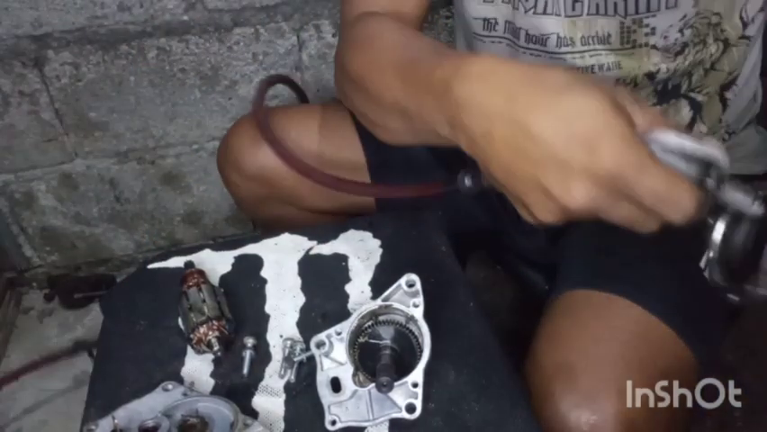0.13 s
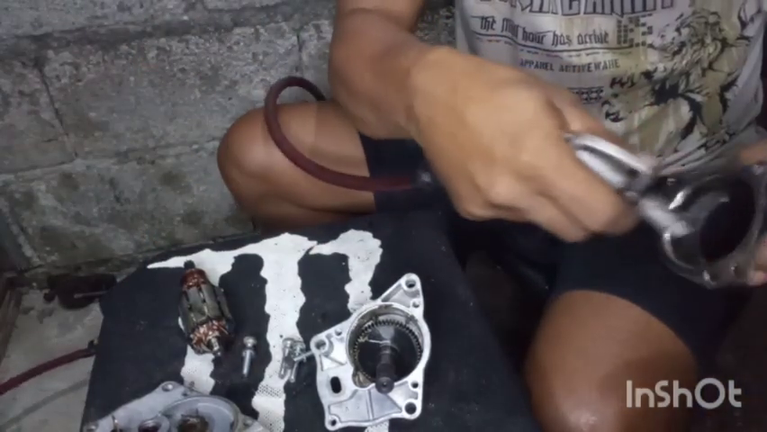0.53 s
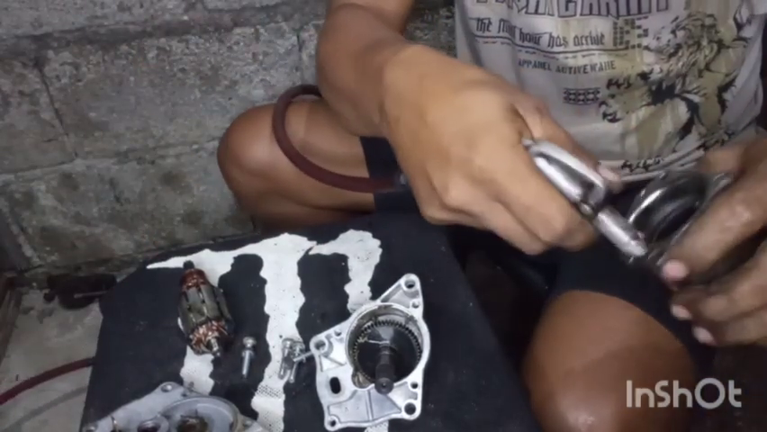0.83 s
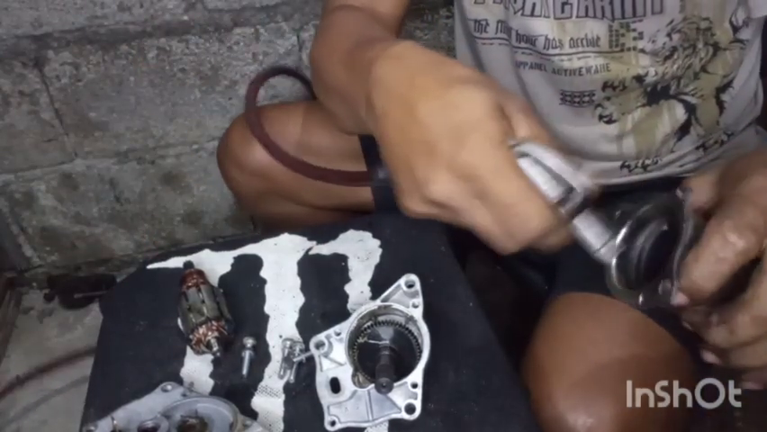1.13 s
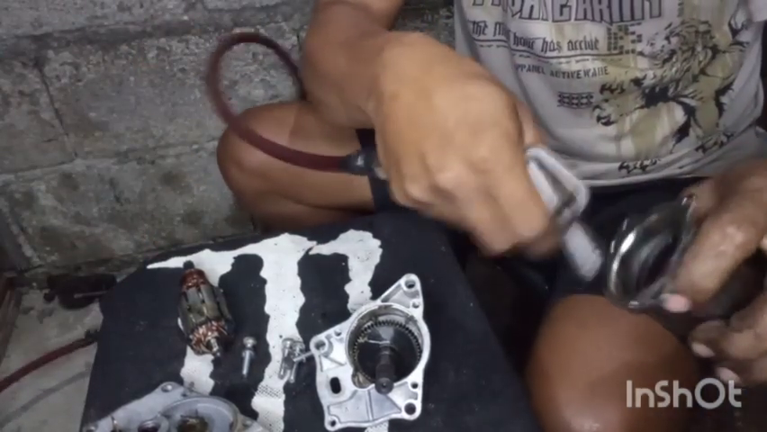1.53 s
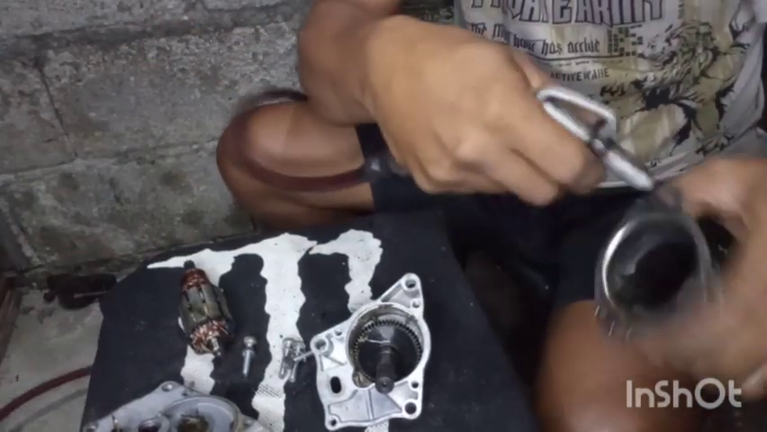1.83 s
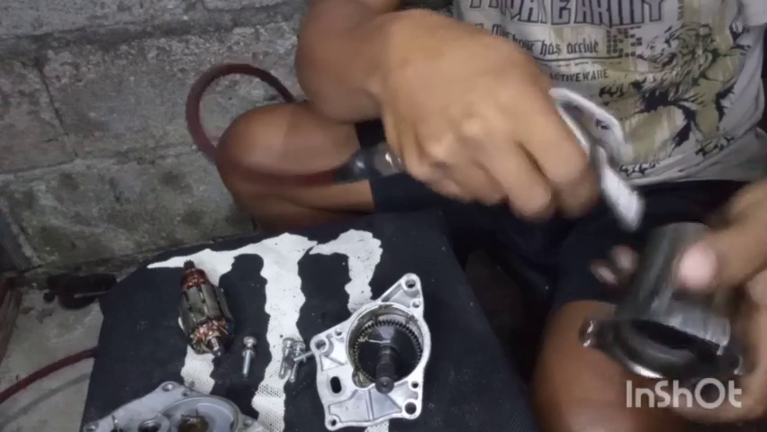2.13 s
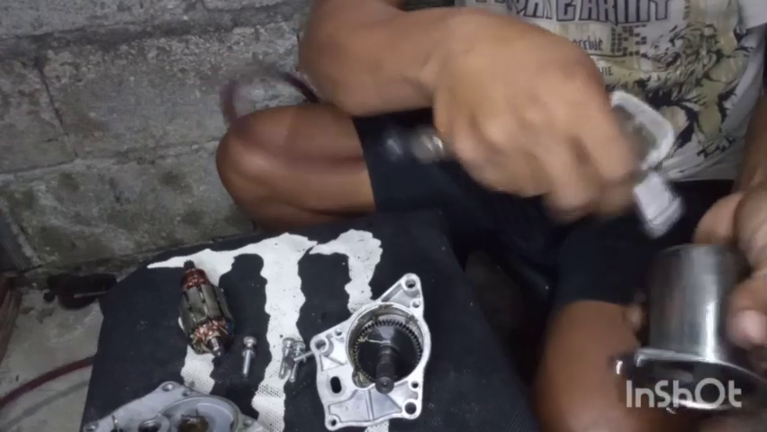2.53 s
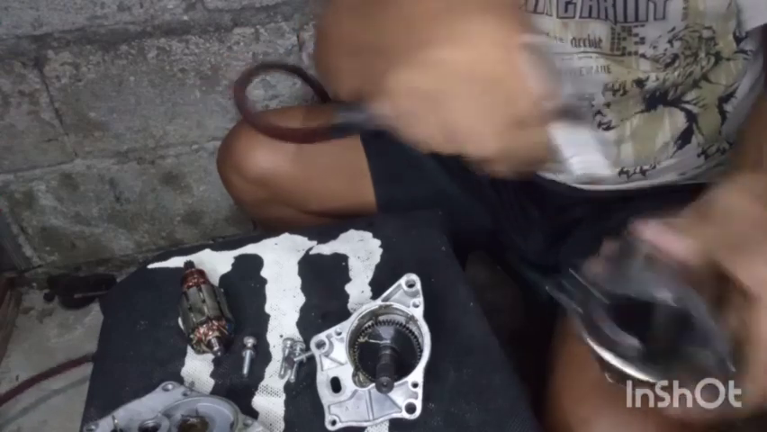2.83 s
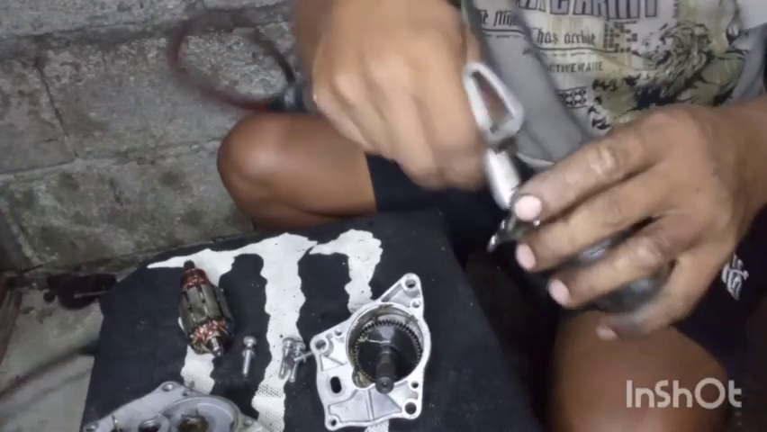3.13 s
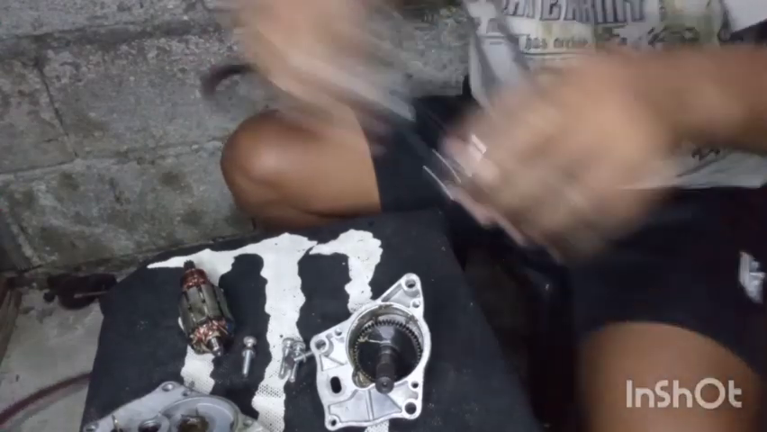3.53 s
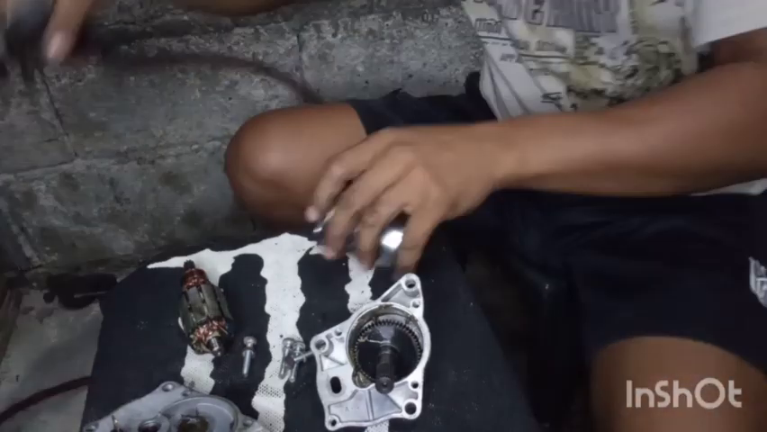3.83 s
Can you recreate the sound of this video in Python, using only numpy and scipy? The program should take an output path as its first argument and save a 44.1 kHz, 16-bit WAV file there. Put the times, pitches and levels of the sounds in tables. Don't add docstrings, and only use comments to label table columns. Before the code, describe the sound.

A compressed-air blow gun hisses loudly and sharply from 0 to about 3.45 seconds, sweeping a hollow metal motor housing. The jet whistles high, flares on edges, roars in bores and makes brief bottle-like hoots, with low gusts and overload crackle at a close small microphone. It shuts off quickly; faint yard ambience and chirps return, a dull double thud lands on a mat near 3.78, then a tiny airy puff at 3.94.

```python
import sys
import numpy as np
from scipy import signal
from scipy.fft import rfft, irfft
from scipy.io import wavfile
from scipy.ndimage import map_coordinates

SR = 44100
rng = np.random.default_rng(int(sys.argv[2]) if len(sys.argv) > 2 else 0)


def bounce(signal):
    frames = np.transpose(np.atleast_2d(signal))
    limited = np.clip(frames, -1, 1)
    pcm = np.round(limited * 32767).astype(np.int16)
    wavfile.write(sys.argv[1], SR, pcm)


def amplitude_ratio(level_db):
    exponent = np.asarray(level_db, float) / 20
    return 10 ** exponent


N = 176400
T = np.arange(N) / SR
HZ = np.fft.rfftfreq(N, 1 / SR)
RELEASE_S = 3.453


def rms_one(x):
    return x / np.sqrt(np.mean(x ** 2) + 1e-20)


def drift(rate_hz):
    count, step_s = N // 20, 20 / SR
    slowing = 1 + (np.fft.rfftfreq(count, step_s) / rate_hz) ** 2
    slow = irfft(rfft(rng.standard_normal(count)) / slowing, count)
    return np.interp(T, np.arange(count) * step_s, rms_one(slow))


def swells(rows, rest_db):
    power = sum(amplitude_ratio(2 * r[2]) * np.exp(-8 * np.log(2) * np.abs((T - r[0]) / r[1]) ** 3) for r in rows)
    return 10 * np.log10(power + amplitude_ratio(2 * rest_db))


def nudges(rows):
    return sum(db * np.exp(-2.0 * ((T - s) / length) ** 2) for s, length, db in rows)


def whistle(hz, width_hz):
    f = np.fft.fftfreq(N, 1 / SR)
    noise = np.fft.fft(rng.standard_normal(N)) * np.exp(2j * np.pi * rng.random(N))
    base = np.fft.ifft(noise / (1 + (1.3 * f / width_hz) ** 2))
    return rms_one(np.real(base * np.exp(2j * np.pi * np.cumsum(hz + 0 * T) / SR)))


def patchy(spectrum, patchy_db, rate_hz):
    hz, db = np.transpose(spectrum)
    place = 3 * np.log2(np.maximum(HZ, 20) / 20)
    colour = amplitude_ratio(np.interp(np.log(HZ + 1), np.log(hz), db, left=-70))
    coloured = rfft(rng.standard_normal(N)) * colour
    together = drift(6.6)
    out = 0
    for k in range(int(3 * np.log2(hz[0] / 20)), 31):
        band = irfft(coloured * np.clip(1 - abs(place - k), 0, 1), N)
        out = out + band * amplitude_ratio(patchy_db * (0.6 * together + drift(rate_hz)))
    return rms_one(out)


def ring(clicks, hz, t60):
    r, w = amplitude_ratio(-60 / (t60 * SR)), 2 * np.pi * hz / SR
    return signal.lfilter([0, np.sin(w)], [1, -2 * r * np.cos(w), r * r], clicks + 1e-18)


def dying_noise(s, t60, low_hz, high_hz):
    band = signal.butter(2, [low_hz, high_hz], "band", fs=SR, output="sos")
    noise = signal.sosfilt(band, rng.standard_normal(N))
    return rms_one(noise) * (T > s) * amplitude_ratio(-60 * np.maximum(T - s, 0) / t60)


# frequency in Hz, density in dB per Hz.
YARD = [(45, -24), (190, -15.5), (560, -5.5), (1300, -18.5), (2800, -23), (6300, -31.5), (10500, -33.5),
        (15700, -57)]
# centre in seconds, length in seconds, pitch in Hz, level in dB.
CHIRPS = [(3.58, .05, 560, -52), (3.52, .06, 620, -56), (3.67, .08, 2000, -66), (3.72, .05, 2830, -66),
          (3.55, .12, 1500, -65), (3.71, .16, 1620, -67), (3.86, .1, 1600, -67), (3.7, .14, 2450, -68),
          (3.75, .05, 6210, -69), (3.905, .05, 6190, -65), (3.94, .03, 1060, -55), (3.98, .07, 650, -54),
          (3.965, .06, 2900, -65), (3.57, .12, 70, -54), (3.87, .07, 75, -54), (3.95, .08, 90, -53),
          (3.69, .03, 220, -54), (3.96, .06, 260, -58)]


def yard():
    floor_db, ducked_db, recover_s = -52, -21.5, 0.012
    duck_db = ducked_db * np.exp(-np.maximum(T - RELEASE_S, 0) / recover_s)
    out = amplitude_ratio(floor_db + duck_db) * patchy(YARD, patchy_db=3.0, rate_hz=11.0)
    for s, length, hz, db in CHIRPS:
        out += amplitude_ratio(swells([(s, length, db)], -99)) * whistle(hz, 19 + 0.014 * hz)
    return out


# contact in seconds, peak in dB.
THUDS = [
    (3.7745, -48),
    (3.7768, -29.5),
    (3.785, -28),
    (3.828, -48),
    (3.837, -44),
]
# frequency in Hz, level in dB, 60 dB decay in seconds.
MAT = [(129.7, 2.5, 0.082), (273, 9, 0.023), (332, 2.5, 0.055), (502, -8.5, 0.043), (655, -8.5, 0.045),
       (1180, -14, 0.018)]


def thud():
    rustle_db, rustle_t60 = -15, .05
    clicks, out = np.zeros(N), 0
    for s, db in THUDS:
        clicks[int(s * SR)] = amplitude_ratio(db)
        low = dying_noise(s, rustle_t60, 790, 2100)
        high = dying_noise(s, rustle_t60, 4200, 16000)
        out = out + amplitude_ratio(db + rustle_db) * (low + 0.15 * high)
    for k, (hz, db, t60) in enumerate(MAT):
        out = out - amplitude_ratio(db) * ring(clicks, hz, t60) * (-1) ** k
    return out


def valve_tick():
    return amplitude_ratio(-55) * dying_noise(3.942, 0.21, 7200, 18000)


# centre in seconds, length in seconds, level in dB.
HOOTS = [(.18, 0.038, -42), (.225, 0.033, -52), (.265, 0.038, -37), (.335, 0.036, -47), (.4, 0.047, -41),
         (.46, 0.026, -48), (.62, .04, -50), (1.0, 0.039, -39.5), (1.1, 0.041, -43), (1.141, 0.022, -34.5),
         (1.24, 0.07, -37.5), (1.355, 0.048, -34), (1.48, 0.07, -40), (1.56, 0.029, -42.5),
         (1.66, 0.03, -45), (1.77, 0.083, -39), (2.22, 0.055, -44.5), (2.42, 0.035, -49),
         (2.87, 0.057, -40.5), (2.93, 0.03, -34.5), (2.99, .05, -35.5), (3.05, 0.028, -39.5),
         (3.1, 0.026, -41), (3.185, 0.032, -36), (3.25, 0.038, -48), (3.32, 0.04, -36.5),
         (3.375, 0.038, -35.5), (3.42, .04, -43.5), (3.455, 0.019, -38)]


def cup():
    cup_hz, wobble_hz = 1045, 22
    tone = np.sqrt(2) * np.sin(2 * np.pi * np.cumsum(cup_hz + wobble_hz * drift(30.05)) / SR)
    breath = .75 * whistle(cup_hz, 110) + .4 * whistle(cup_hz, 400)
    return amplitude_ratio(swells(HOOTS, -70) - 4.5) * (tone + breath)


# centre in seconds, length in seconds, level in dB.
GUSTS = [(.065, 0.022, -39), (.32, 0.043, -41.5), (.6, 0.036, -49.5), (.94, 0.039, -52), (1.07, .04, -47.5),
         (1.25, 0.047, -44), (1.58, 0.029, -51.5), (1.85, 0.026, -48.5), (2.28, 0.023, -46),
         (2.45, .03, -45.5), (2.68, 0.067, -46), (3.24, 0.029, -44)]


def gusts():
    rumble = signal.lfilter(*signal.butter(2, 90, "high", fs=SR), whistle(220.4, 410))
    return amplitude_ratio(swells(GUSTS, -81)) * rumble


# centre in seconds, length in seconds, level in dB, pitch in Hz.
BORES = [
    (.064, 0.073, -40, 4400),
    (1.155, .06, -33, 4300),
    (1.44, 0.075, -31.5, 5220),
    (1.634, .045, -38.5, 3800),
    (1.814, 0.066, -31, 4295),
    (2.909, 0.028, -31.5, 4300),
    (3.02, 0.045, -34.5, 4285),
    (3.173, 0.038, -38.5, 4580),
]


def bores():
    return sum(amplitude_ratio(swells([(s, length, db)], -99)) * whistle(hz, 1600) for s, length, db, hz in BORES)


# time in seconds, nozzle whistle in Hz, part turned to the microphone in dB,
# nearness as ultrasound in dB, line pressure in dB.
HOLD = [(0, 12640, -26, 2.5, 3), (0.081, 12670, -53, 5, 3), (0.092, 12670, -47.5, -2, -1.5),
        (0.451, 12560, -31, 1.5, 2.5), (.7, 12540, -30, 2, 2.5), (1, 12600, -35, 1, 1),
        (1.3, 12410, -32, 3, 3), (1.601, 12350, -29.5, 1, 3.5), (1.701, 12400, -31.5, 1.5, -2),
        (1.9, 12410, -31.5, 0.5, 1.5), (2.101, 12150, -36.5, 2, 0.5), (2.451, 12190, -38.5, 0.5, 2.5),
        (2.548, 12300, -42, 0.5, 0), (2.899, 12050, -32.5, -0.5, 0.5), (3, 11990, -33, -0.5, -2.5),
        (3.25, 12020, -28.5, -2, 2), (3.349, 11900, -33, -9, -10), (3.45, 12030, -35, -5, -4)]


def held():
    s, *columns = np.transpose(HOLD)
    return [np.interp(T, s, column) for column in columns]


# centre in seconds, length in seconds, level in dB.
GRAZES = [(0.064, 0.043, -25.5), (0.2, 0.19, -26), (0.447, 0.055, -28.5), (0.88, 0.031, -28),
          (0.948, 0.042, -27), (1.826, 0.043, -24.5), (2.917, 0.029, -35), (3.087, 0.054, -26.5),
          (3.215, 0.038, -27), (3.382, 0.053, -30)]


def rim(turned_db):
    level = np.hypot(amplitude_ratio(turned_db - 3.5), amplitude_ratio(swells(GRAZES, -80) - 4.5))
    rim_hz = 6584 - 45 * T + 30 * drift(4.84)
    return level * amplitude_ratio(0.79 * drift(5.3)) * whistle(rim_hz, 450)


# centre in seconds, length in seconds, level in dB,
# lean to the upper resonance in dB.
EDGES = [(0.083, 0.15, -21.5, 6), (0.212, 0.052, -25.5, -1), (0.321, 0.064, -24, 3), (0.53, 0.016, -25, 19),
         (0.652, 0.079, -28, 3), (0.955, 0.12, -24, 0), (1.08, 0.051, -25.5, -4),
         (1.236, 0.032, -28.5, -11), (1.402, 0.031, -35, -3), (1.531, 0.046, -31, -1),
         (1.723, 0.029, -24, 3), (1.854, 0.015, -26, 4), (1.96, 0.074, -26, -5.5), (2.142, 0.027, -27.5, 1),
         (2.22, 0.06, -28, -5), (2.288, 0.052, -21.5, 5), (2.35, 0.066, -25.5, 3), (2.5, 0.026, -30, 1),
         (2.43, 0.06, -23, 6), (2.571, 0.03, -29, 8.5), (2.673, 0.075, -21, 7), (2.774, 0.019, -22, 7),
         (2.905, 0.058, -35, -5.5), (3.034, 0.044, -26.5, 1), (3.117, 0.031, -25.5, 7),
         (3.231, 0.015, -21, 19), (3.329, 0.023, -22.5, 12), (3.418, 0.044, -24.5, 0)]
# frequency in Hz, width in Hz, level in dB, share of the lean.
EDGE_RINGS = [(9080, 1130, 1.5, -0.72), (9560, 500, -4.5, 0.14), (10324, 680, 1.5, 0.36)]


def edges(edge_db):
    lean_db = nudges([(s, length, lean) for s, length, db, lean in EDGES])
    out = 0
    for hz, width, db, share in EDGE_RINGS:
        out = out + amplitude_ratio(db + share * lean_db + 1.9 * drift(9.1)) * whistle(hz, width)
    return amplitude_ratio(edge_db - 8.0) * out


def nozzle(whistle_hz):
    narrow = amplitude_ratio(-33 + 0.37 * drift(22)) * whistle(whistle_hz, 150)
    shoulder = amplitude_ratio(-32 + 1.33 * drift(5.2)) * whistle(12860, 1540)
    return narrow + shoulder


# centre in seconds, length in seconds, ultrasound change in dB.
SWINGS = [(0.45, 0.044, -0.5), (0.653, 0.055, 1), (0.786, .06, -1), (1.405, 0.016, 3), (1.445, 0.042, -14),
          (1.6, 0.056, -2.5), (1.881, 0.046, -1), (2.07, 0.028, -2.5), (2.195, 0.074, 1.5),
          (2.366, 0.035, 0.5), (2.442, .03, 1.5), (2.56, 0.066, 0), (2.67, .04, 0.5), (2.813, 0.033, 1),
          (3.284, 0.033, 0), (3.34, .03, 5)]


def ultrasound(near_db, edge_db):
    above = irfft(rfft(rng.standard_normal(N)) * (HZ > 16500) * (HZ < 21500), N)
    follow_db = 0.46 * (swells(EDGES, -30.5) - edge_db.mean())
    return amplitude_ratio(-19 + near_db + nudges(SWINGS) + follow_db + 0.91 * drift(25)) * rms_one(above)


# frequency in Hz, density in dB per Hz.
JET = [(900, -10), (2200, -20), (3700, -5.5), (4500, -8.5), (5500, 2), (8000, -7.5), (11500, 1),
       (15800, -1.5)]


def jet():
    whistle_hz, turned_db, near_db, pressure_db = held()
    edge_db = swells(EDGES, -25)
    hiss = amplitude_ratio(-27.5 + 0.08 * (turned_db - turned_db.mean())) * patchy(JET, patchy_db=1.5, rate_hz=21.0)
    after = np.maximum(T - RELEASE_S, 0)
    fall_db_per_s, linger_s, shut_s, shut_db = 314, .028, .006, -7.5
    linger = amplitude_ratio(fall_db_per_s * np.minimum(after, linger_s))
    blowing = linger * (edges(edge_db) + amplitude_ratio(pressure_db) * nozzle(whistle_hz))
    blowing += rim(turned_db) + bores() + hiss + ultrasound(near_db, edge_db) + gusts()
    shut = amplitude_ratio(shut_db * np.minimum(after / shut_s, 1) - fall_db_per_s * after)
    dull = signal.lfilter(*signal.butter(2, 5700, fs=SR), hiss)
    return shut * blowing + amplitude_ratio(-20 - 50 * after) * dull


# delay in seconds, level in dB.
ECHOES = [
    (.0011, -6.5),
    (.0027, -5.5),
    (.0061, -7.5),
    (0.0117, -7),
    (0.0186, -10.5),
]


def echoes(x):
    wander_s, wander_hz = 0.0001198, 2.47
    out = x.copy()
    for lag, db in ECHOES:
        heard_from = (T - lag - wander_s * drift(wander_hz)) * SR
        out += amplitude_ratio(db) * map_coordinates(x, [heard_from], order=3, mode="mirror")
    return out / np.sqrt(1 + sum(amplitude_ratio(2 * db) for lag, db in ECHOES))


def scene():
    return (yard() + thud() + valve_tick() + cup() + echoes(jet()))[None]


def band_limit(x):
    return signal.sosfilt(signal.butter(12, 15740, fs=SR, output="sos"), x)


# frequency in Hz, width in Hz, depth in dB.
MIC_DIPS = [(8070, 820, -5.5), (14420, 2250, -7)]


def record(dry):
    overload, overload_cut_hz, bass_cut_hz = 0.8, 8800, 107
    bent = signal.lfilter(*signal.butter(1, overload_cut_hz, fs=SR), dry ** 2)
    bent = bent - bent[:, :2000].mean()
    bent = signal.sosfilt(signal.butter(3, bass_cut_hz, "high", fs=SR, output="sos"), bent)
    hz = np.fft.rfftfreq(N + SR, 1 / SR)
    port_db = sum(db * np.exp(-((hz - dip_hz) / width * 2) ** 2) for dip_hz, width, db in MIC_DIPS)
    heard = irfft(rfft(dry + overload * bent, N + SR) * amplitude_ratio(port_db), N + SR)[:, :N]
    mix = signal.sosfilt(signal.ellip(10, .5, 85, 15800, fs=SR, output="sos"), heard)
    return band_limit(mix)


dry = scene()
out = record(dry)
bounce(out)
```